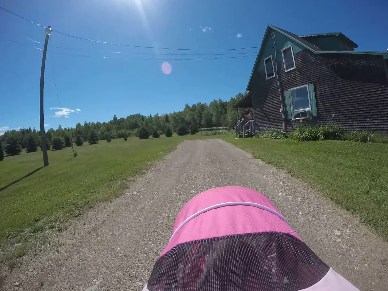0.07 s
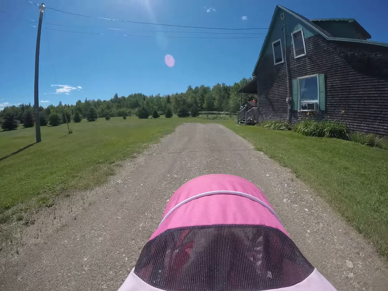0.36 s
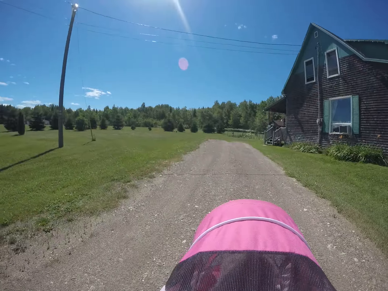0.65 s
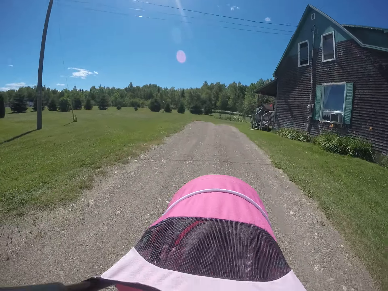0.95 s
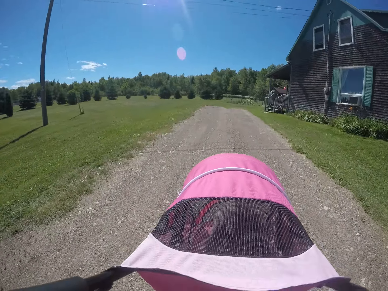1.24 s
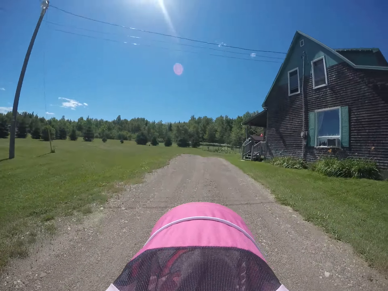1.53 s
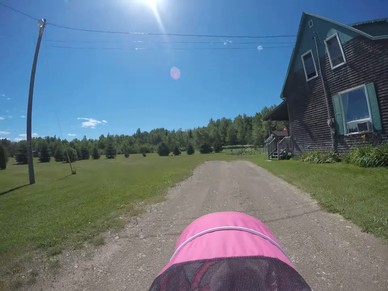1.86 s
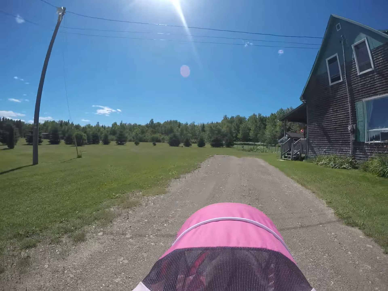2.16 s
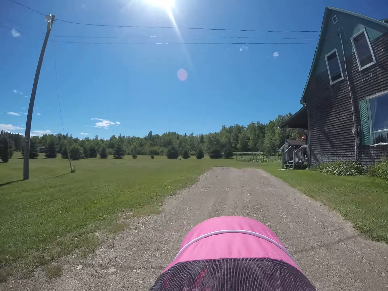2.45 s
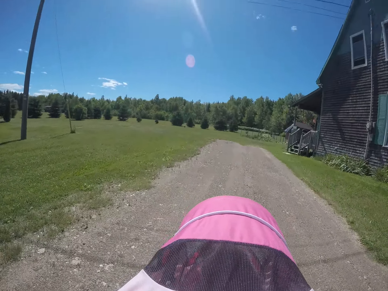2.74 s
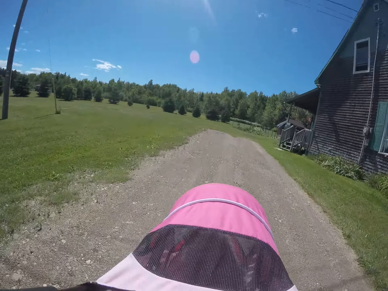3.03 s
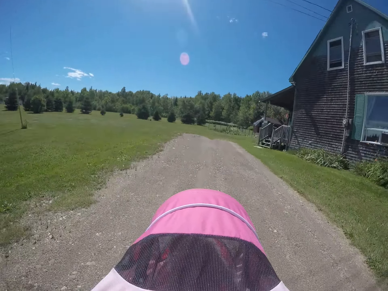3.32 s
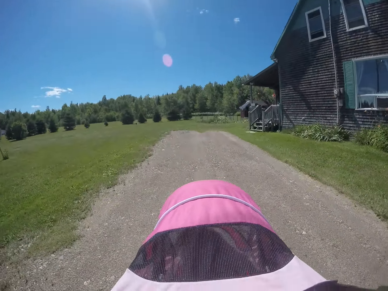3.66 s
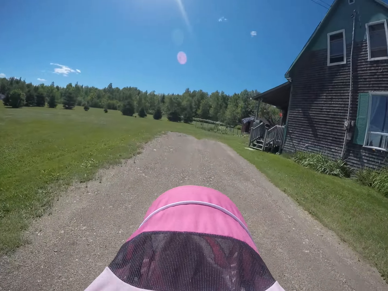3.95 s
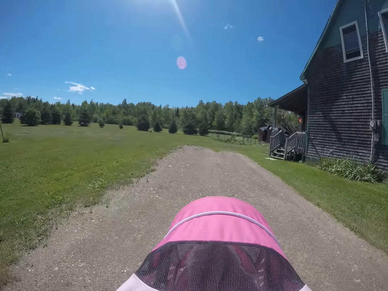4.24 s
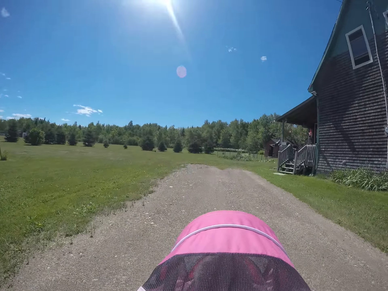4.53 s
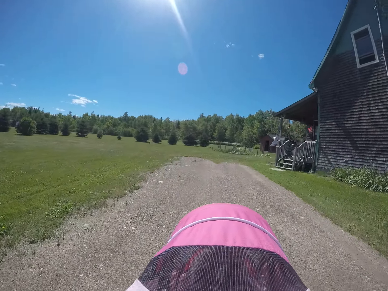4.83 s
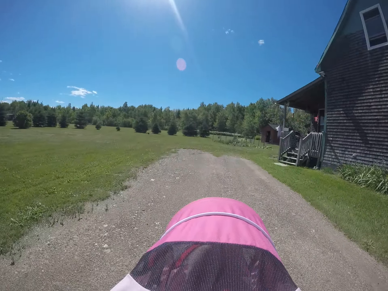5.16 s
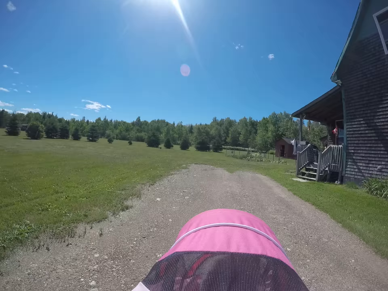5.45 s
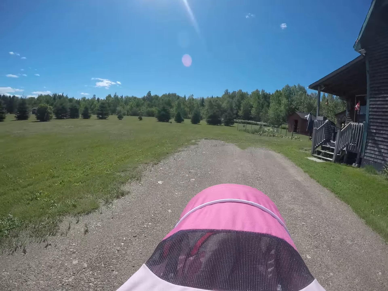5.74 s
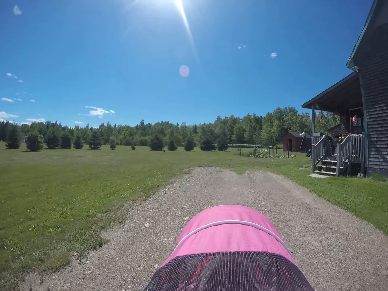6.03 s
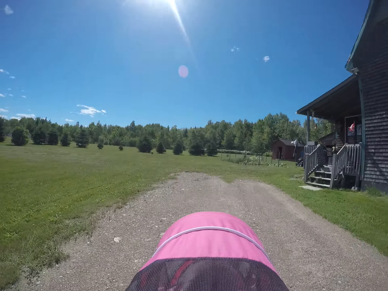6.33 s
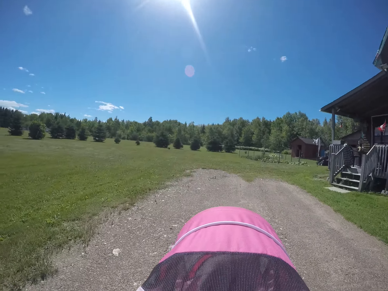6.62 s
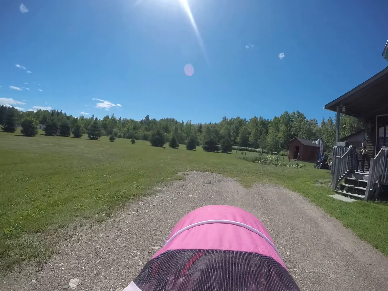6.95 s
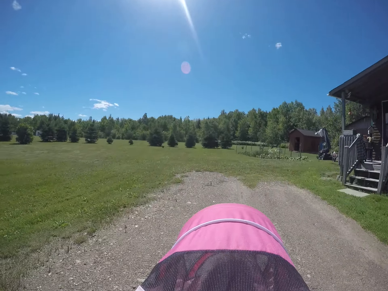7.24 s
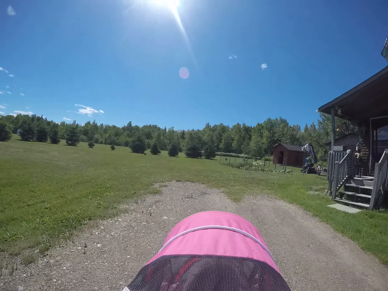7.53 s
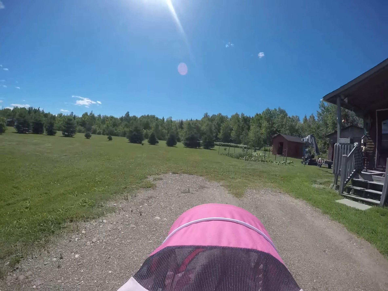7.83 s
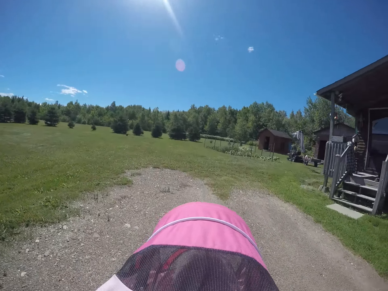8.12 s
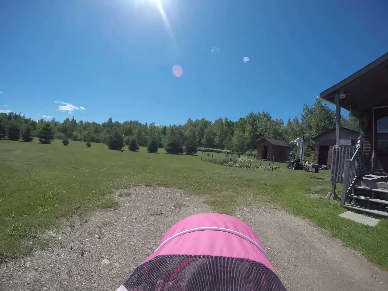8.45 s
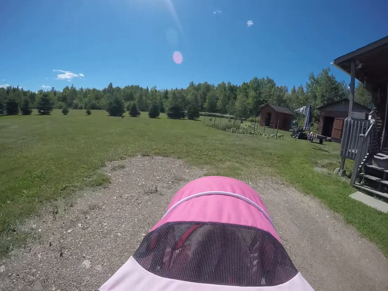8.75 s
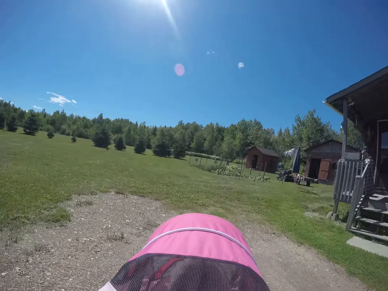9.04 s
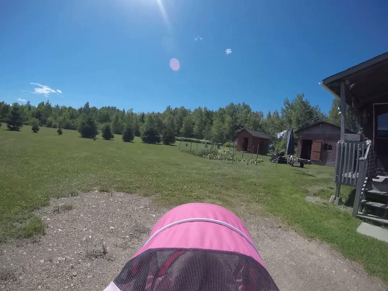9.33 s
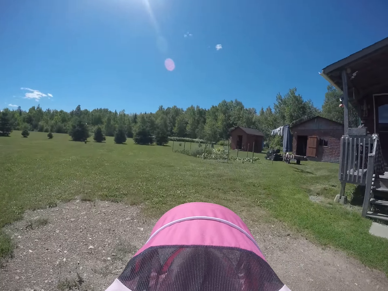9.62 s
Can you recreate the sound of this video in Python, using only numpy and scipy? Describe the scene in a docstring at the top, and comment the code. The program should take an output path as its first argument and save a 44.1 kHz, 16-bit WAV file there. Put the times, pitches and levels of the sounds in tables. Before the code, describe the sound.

A stroller rolls over gravel, its plastic and metal parts knocking and rattling above a low rumble and soft crunch.

```python
"""Stroller on a gravel drive

A stroller is pushed down a gravel drive with a camera fixed to its frame. On the bumps the loose mount
knocks against its stop, and now and then a frame joint clacks; each impact excites damped modes.
Beneath them the uneven ground forces a deep shudder from the frame, the tyres rumble and drum the
hollow body, and many small stone contacts sum to a soft crunch."""
import sys
import numpy as np
from scipy import signal
from scipy.fft import rfft, irfft
from scipy.io import wavfile
from scipy.ndimage import uniform_filter1d, minimum_filter1d

SR = 44100
rng = np.random.default_rng(int(sys.argv[2]) if len(sys.argv) > 2 else 0)


def materialize(psi):
    """Save the field psi as 16-bit PCM at rate SR to the path in sys.argv[1].

    A 1-D psi becomes a single channel; in a 2-D psi each row is a channel.
    """
    bounded = np.clip(np.atleast_2d(psi).T, -1, 1)
    quanta = np.round(bounded * 32767).astype(np.int16)
    wavfile.write(sys.argv[1], SR, quanta)


N = 426888
TIME = np.arange(N) / SR
BLOW_SIZE = 16384  # samples
BLOW_HZ = np.fft.rfftfreq(BLOW_SIZE, 1 / SR)
NOTE_DAMPING = .33  # bandwidth of a clack's or bump's hollow note as a share of its pitch

# strength of the frame's shudder: time_s, level_db
SHUDDER_LEVEL = [(0.0, -18.5), (0.38, -14.5), (0.52, -25.5), (0.76, -20), (0.86, -44), (0.95, -13),
                 (2.9, -17), (3.72, -15), (3.88, -25.5), (4.05, -17), (4.6, -14), (6.4, -17), (6.8, -14.5),
                 (7.7, -14.5), (8.05, -18), (8.7, -15.5), (9.3, -20.5), (9.55, -15)]
# spectrum of the shudder: frequency_hz, level_db
SHUDDER_SPECTRUM = [(5, -28), (11, -8), (17, -4.5), (34, 0), (42, -7), (52, -9.5), (65, -17.5), (80, -26.5),
                    (110, -32.5), (200, -48.5), (500, -89.5), (4000, -120)]
# roughness of the ground, heard as tyre rumble: time_s, level_db
GROUND_ROUGHNESS = [(0.0, -47), (0.38, -49), (0.5, -50), (0.85, -59), (1.1, -47), (1.85, -39), (2.8, -47.5),
                    (3.7, -42.5), (4.1, -53), (4.35, -39.5), (5.1, -51), (5.55, -44), (6.5, -49),
                    (6.85, -43.5), (7.6, -43), (8.0, -53), (8.2, -50), (9.2, -50), (9.68, -52)]
# spectrum of the rumble: frequency_hz, level_db
TYRE_SPECTRUM = [(40, -30.5), (100, 2.5), (150, -7), (230, -6.5), (330, -14.5), (500, -18.5), (720, -25),
                 (1000, -38), (2000, -43.5), (6000, -50), (15000, -79.5)]
# loose gravel under the wheels, heard as crunch: time_s, level_db
LOOSE_GRAVEL = [(0.0, -53), (0.8, -59.5), (1.05, -53), (1.5, -60.5), (2.45, -62), (3.1, -61), (3.75, -56),
                (4.1, -63), (4.38, -52.5), (4.65, -58.5), (5.3, -59), (5.75, -58), (6.35, -63), (6.8, -58),
                (7.7, -55.5), (8.7, -58), (9.3, -62), (9.68, -60.5)]
# spectrum of the crunch: frequency_hz, level_db
CRUNCH_SPECTRUM = [(350, -29.5), (650, -6), (900, -2.5), (1700, -8.5), (2200, -5.5), (2650, -3.5),
                   (3050, -6.5), (3550, -7), (3970, -13), (4550, -11), (6200, -18), (7400, -18.5),
                   (12500, -23), (16000, -31.5)]
# how strongly the wheels drum the hollow body: time_s, level_db
DRUMMING_LEVEL = [(0.9, -56), (1.0, -45), (1.95, -50), (2.4, -59), (3.2, -67), (3.7, -58), (4.5, -55.5),
                  (4.9, -66.5), (9.68, -68)]
# damped modes of the joints: pitch_hz, bandwidth_hz, level_db
JOINT_MODES = [(200, 110, -12), (900, 500, -9), (1300, 400, -12), (2280, 240, -3), (2950, 170, -1),
               (3150, 150, 1), (4300, 900, -19), (7000, 1500, -26), (11000, 4000, -30)]
# damped modes of the plastic mount: pitch_hz, bandwidth_hz, level_db
MOUNT_MODES = [(236, 170, -15.5), (718.6, 149, 1.5), (894, 110, -10.5), (1230, 124, -9), (1483, 194, -6),
               (1983, 96, 0), (2220, 110, -1.5), (2316, 140, -2), (2488, 264, -4.5), (3086, 81, -7.5),
               (3280, 200, -5), (3930, 220, -3), (4240, 72, -6), (5040, 83, -15), (5445, 170, -3),
               (5800, 170, -14.5), (6940, 230, -18.5), (8220, 400, -11.5), (9800, 450, -13.5),
               (11820, 1400, -14.5)]
# modes of the metal frame tube: pitch_hz, level_db, t60_s
TUBE_MODES = [(1330, -5, .05), (1846, -12, .28), (2207, -1, .125), (2765, -9, .07), (3232, -8, .1),
              (5340, -11, .05)]
# joint clacks, and a few faint, dull bumps of stones under the wheels:
# start_s, level_db, corner_hz, pitch_hz
CLACKS_AND_BUMPS = [(0.0366, -14.5, 3000, 790), (0.0663, -12, 4770, 1100), (0.1736, -32.5, 2380, 910),
                    (0.3485, -20.5, 2730, 970), (0.3654, -13.5, 16000, 955), (0.477, -34, 2200, 1260),
                    (0.66, -41, 2000, 700), (0.713, -29.5, 1700, 470), (0.7457, -28.5, 1800, 496),
                    (0.84, -36, 1400, 500), (1.3817, -29.5, 3500, 520), (2.008, -16.5, 4320, 487),
                    (2.231, -39, 1800, 905), (2.5075, -17, 15400, 1240), (3.0492, -16.5, 4170, 500),
                    (3.2848, -18, 6400, 507), (3.429, -33, 3600, 690), (3.648, -28, 12300, 442),
                    (3.7518, -25.5, 5350, 980), (3.8073, -21.5, 5400, 450), (6.549, -45.5, 1400, 650),
                    (6.851, -36, 1400, 600), (7.438, -37.5, 1800, 900), (8.1829, -10, 5760, 475),
                    (8.2036, -28, 3300, 467), (8.5501, -22.5, 5600, 1200), (8.566, -24.5, 3000, 470),
                    (8.714, -35, 1800, 900)]
# the mount hits its stop on a bump: start_s, level_db
MOUNT_KNOCKS = [(0.0379, -14.5), (0.0494, -11), (0.3658, -5.5), (0.4, -17), (0.5411, -11), (0.9591, -1.5),
                (1.0126, -21), (1.0628, -15.5), (1.1356, -15.5), (1.2801, -10.5), (1.3179, -21.5),
                (1.3647, -24), (1.4523, -21), (1.5293, -20.5), (1.5706, -21), (1.8012, -8), (1.9626, -15.5),
                (2.0176, -16.5), (2.1107, -15), (2.4939, -9.5), (2.5485, -20), (2.677, -15), (2.7048, -22),
                (2.7535, -20.5), (2.7855, -18.5), (2.824, -23), (2.8523, -17), (2.9625, -15), (3.2557, -6),
                (3.3531, -22.5), (3.402, -20.5), (3.4797, -22.5), (3.54, -22), (3.6217, -15),
                (3.6631, -15.5), (3.7215, -23), (3.7837, -14), (3.8396, -23.5), (3.9041, -13), (3.934, -25),
                (4.0686, -10), (4.0845, -25), (4.1187, -20), (4.2308, -20.5), (4.2824, -24),
                (4.3213, -24.5), (4.3568, -20.5), (4.4348, -21), (4.5403, -20.5), (4.6026, -21.5),
                (4.6539, -30), (5.749, -3), (5.9027, -9.5), (6.0643, -15.5), (6.1357, -9), (6.154, -24),
                (6.7863, -13), (6.8163, -12.5), (8.1153, -5), (8.1338, -25.5), (8.2213, -16), (8.2364, -24),
                (8.3035, -14), (8.364, -17.5), (8.7568, -7.5), (8.9623, -7), (9.092, -7.5), (9.1198, -28),
                (9.4877, -11), (9.512, -19), (9.5527, -14), (9.5811, -24.5), (9.6256, -22), (9.6749, -18.5)]
# contact hardness for a knock listed at 0 dB: time_s, corner_hz
KNOCK_HARDNESS = [(0.4, 19502.5), (1.1, 11998), (2.0, 19497), (3.7, 22503), (4.3, 14496), (6.1, 15493),
                  (6.8, 9998.5), (9.0, 17501.5), (9.6, 14000.5)]
# a stone snaps out from under a tyre: start_s, level_db
STONE_SNAPS = [(1.2434, -33), (2.7184, -26), (2.8404, -31), (3.173, -37.5), (3.4053, -24), (3.6466, -21),
               (4.342, -28), (4.363, -23), (4.4044, -31), (4.48, -30), (4.4888, -22.5), (4.5205, -24),
               (4.782, -29.5), (4.857, -26), (4.9006, -26), (4.9075, -26.5), (5.722, -34.5), (6.0327, -25),
               (7.3203, -40), (7.5375, -30)]
# spectrum of a snap: frequency_hz, level_db
SNAP_SPECTRUM = [(500, -30.5), (1500, 6), (3000, 14.5), (5000, 1.5), (8000, 4.5), (11000, -10.5),
                 (15000, -4), (17000, -15)]


def from_db(db):
    """Amplitude ratio of a level in decibels."""
    return 10 ** (np.asarray(db) / 20)


def unit(x):
    """Normalisation to rms 1."""
    return x / np.sqrt(np.mean(x ** 2) + 1e-20)


def follow(curve):
    """Amplitude envelope through (time_s, level_db) points."""
    return from_db(np.interp(TIME, *np.transpose(curve)))


def coloured(x, spectrum):
    """Spectral shaping by (frequency_hz, level_db) points, to rms 1."""
    hz, db = np.transpose(spectrum)
    shape_db = np.interp(np.log(np.fft.rfftfreq(len(x), 1 / SR) + 1), np.log(hz), db)
    return unit(irfft(rfft(x) * from_db(shape_db), len(x)))


def add(mix, start_s, sound):
    """Superposition: a sound joins the mix at start_s."""
    part = mix[max(round(start_s * SR), 0):][:len(sound)]
    part += sound[:len(part)]


def swell(depth_db, size):
    """Random amplitude modulation: a gain that wanders over about size samples."""
    drift = uniform_filter1d(rng.standard_normal(N), size, mode="wrap")
    return from_db(depth_db * unit(uniform_filter1d(drift, size // 2, mode="wrap")))


def stones(per_s, spread_db):
    """A Poisson process of stone contacts, mostly small and a few large."""
    out, at = np.zeros(N), np.flatnonzero(rng.random(N) < per_s / SR)
    draw = rng.uniform(-1, 1, N)[at]
    size = np.minimum(-np.log(abs(draw) + 1e-9), 4)
    out[at] = np.sign(draw) * from_db(spread_db * size)
    return out


def modal_response(modes, scatter_db):
    """Damped modes superpose; the point of contact changes their shares from blow to blow."""
    hz, width_hz, db = np.transpose(modes)[:, :, None]
    share = from_db(db + scatter_db * rng.standard_normal(db.shape))
    loss = 1j * BLOW_HZ * np.maximum(width_hz, 105)  # no mode is narrower than 105 Hz, so none rings for long
    return (share * loss / (hz ** 2 - BLOW_HZ ** 2 + loss)).sum(0)


def contact(corner_hz):
    """Spectrum of a force pulse: the shorter the contact, the higher the corner."""
    rounded = np.exp(-(BLOW_HZ / (2.8 * corner_hz)) ** 2)  # the pulse starts and ends gently
    return rounded * (1 + 1j * BLOW_HZ / corner_hz) ** -4


def rebounding(share, gap_s):
    """Comb filtering: a weaker second contact follows the first after an uneven gap."""
    return 1 + share * np.exp(-2j * np.pi * BLOW_HZ * gap_s * rng.uniform(.65, 1.35))


def bending(spread_s, knee_hz=2500):
    """Dispersion of bending waves: the treble arrives first, the bass later."""
    return np.exp(-2j * np.pi * spread_s * knee_hz * np.arctan(BLOW_HZ / knee_hz))


def blow(spectrum, db):
    """Energy normalisation: a blow that, packed into two milliseconds, has the given level."""
    wave = irfft(spectrum)
    return from_db(db) * wave / np.sqrt(np.sum(wave ** 2) / (.002 * SR))


def frame_shudder(level_db=1.78, lurch_db=2.0, steadiness=0.87):
    """Forced vibration: uneven ground shakes the sprung frame in lurches of nearly even strength."""
    shake = coloured(rng.standard_normal(N), SHUDDER_SPECTRUM) * swell(lurch_db, size=2000)
    power = uniform_filter1d(shake ** 2, size=5500)
    strength = np.sqrt(uniform_filter1d(power, size=3500) + 1e-6)
    return from_db(level_db) * follow(SHUDDER_LEVEL) * shake / strength ** steadiness


def tyre_rumble(level_db=4.0, lumps_db=3.0):
    """Shot noise: pebbles press into the tyres as dull, overlapping thumps."""
    thumps = stones(per_s=400, spread_db=3.64) * swell(lumps_db, size=1400)
    return from_db(level_db) * follow(GROUND_ROUGHNESS) * coloured(thumps, TYRE_SPECTRUM)


def grinding(bump_db=2.5, decay_s=0.023):
    """Envelope of the crunch: it follows the loose gravel and rises briefly as the mount knocks."""
    bumps = np.zeros(N)
    for start_s, _ in MOUNT_KNOCKS:  # these bumps grind the stones harder
        add(bumps, start_s, np.exp(-TIME[:BLOW_SIZE] / decay_s))
    return follow(LOOSE_GRAVEL) * from_db(bump_db * np.minimum(bumps, 1))


def gravel_crunch(clump_db=4.0, wash=0.8, surge_db=1.9):
    """Granular friction: grit grinds under the wheels in clumps and slower surges, over a sandy wash."""
    grit = unit(stones(per_s=1900, spread_db=4.5) * swell(clump_db, size=900))
    crunch = coloured(grit + wash * rng.standard_normal(N), CRUNCH_SPECTRUM)
    return grinding() * swell(surge_db, size=3000) * crunch


def pebble_scrapes(level_db=-4, decay_s=0.0079, width=0.24, db_per_octave=-5.5, middle_hz=2800):
    """Sliding friction: each size of pebble scrapes in its own band, the middle sizes loudest."""
    out, t = np.zeros(N), TIME[:2048]
    hz = np.fft.rfftfreq(len(t), 1 / SR)
    for pitch_hz in np.geomspace(1100, 8500, 16):
        band = np.exp(-.5 * ((hz / pitch_hz - 1) / width) ** 2)
        scrape = unit(irfft(rfft(rng.standard_normal(len(t))) * band)) * np.exp(-t / decay_s)
        gain = from_db(db_per_octave * abs(np.log2(pitch_hz / middle_hz)))
        out += gain * signal.oaconvolve(stones(per_s=6, spread_db=4.5), scrape)[:N]
    return from_db(level_db) * grinding() * unit(out)


def frame_ticks(level_db=-1, corner_hz=9000, decay_s=0.0074):
    """Structure-borne sound: stones slipping under the rims excite the upper modes of the joints."""
    out, t = np.zeros(N), TIME[:BLOW_SIZE]
    for wheel in range(4):
        chatter = rfft(rng.standard_normal(BLOW_SIZE) * np.exp(-t / decay_s))
        tick = irfft(modal_response(JOINT_MODES[3:], scatter_db=6.5) * contact(corner_hz) * chatter)
        out += signal.oaconvolve(stones(per_s=12, spread_db=2.0), unit(tick[:2048]))[:N]
    return from_db(level_db) * grinding() * unit(out)


def body_drumming(corner_hz=1100):
    """Resonance: on coarse gravel, soft blows from the tyres sustain the low modes of the plastic."""
    thud = irfft(modal_response(MOUNT_MODES, scatter_db=0.5) * contact(corner_hz))
    thuds = signal.oaconvolve(stones(per_s=350, spread_db=3.5), thud)[:N]
    return follow(DRUMMING_LEVEL) * unit(thuds)


def tube_ring(buzz_db=-15, buzz_s=0.028):
    """Free vibration: spectrum of the struck frame tube, with a brief buzz of its loose fittings."""
    t = TIME[:BLOW_SIZE]
    ring = sum(from_db(db - 60 * t / t60) * np.sin(2 * np.pi * hz * t) for hz, db, t60 in TUBE_MODES)
    buzz = from_db(buzz_db) * np.exp(-t / buzz_s) * rng.standard_normal(BLOW_SIZE)
    return rfft(ring + buzz)


def clacks_and_bumps(level_db=3.1, ring_db=-69, spread_s=0.0014):
    """Impact and rebound: a joint clacks, or a stone bumps dully under a wheel, in two quick contacts."""
    out, ring, travel = np.zeros(N), from_db(ring_db) * tube_ring(), bending(spread_s)
    for start_s, db, corner_hz, pitch_hz in CLACKS_AND_BUMPS:
        modes = [(pitch_hz, NOTE_DAMPING * pitch_hz, 0), *JOINT_MODES]
        force = contact(corner_hz) * rebounding(share=.65, gap_s=.0026)
        response = modal_response(modes, scatter_db=2) + ring
        add(out, start_s - spread_s / 2, blow(response * force * travel, db + level_db))
    return out


def settling_chatter(level_db=-23, level_slope=0.67, decay_s=0.02, corner_hz=4800):
    """Frictional excitation: a brief scuff follows each clack or bump, relatively more if it is light."""
    out, settling = np.zeros(N), np.exp(-TIME[:BLOW_SIZE] / decay_s)
    for start_s, db, _, pitch_hz in CLACKS_AND_BUMPS:
        modes = [(pitch_hz, NOTE_DAMPING * pitch_hz, -3), *JOINT_MODES]
        friction = rfft(rng.standard_normal(BLOW_SIZE))
        rubbing = irfft(friction * modal_response(modes, scatter_db=-1) * contact(corner_hz))
        add(out, start_s, from_db(level_db + level_slope * db) * settling * unit(rubbing))
    return out


def mount_knocks(level_db=5.0, ring_db=-57.0, spread_s=.0008, db_per_octave=8.5):
    """Elastic impact: the harder the plastic mount hits its stop, the shorter and brighter the blow."""
    out, ring, travel = np.zeros(N), from_db(ring_db) * tube_ring(), bending(spread_s)
    for start_s, db in MOUNT_KNOCKS:
        corner_hz = np.interp(start_s, *np.transpose(KNOCK_HARDNESS)) * 2 ** (db / db_per_octave)
        force = contact(corner_hz) * rebounding(share=0.16, gap_s=0.000926)
        response = modal_response(MOUNT_MODES, scatter_db=2.7) + ring
        add(out, start_s - spread_s / 2, blow(response * force * travel, db + level_db))
    return out


def stone_snaps(decay_s=0.00055, skitter_db=-20, skitter_s=0.023):
    """Hard impact: stone on stone gives a broadband tick, and a few grains skitter after it."""
    out, t = np.zeros(N), TIME[:2048]
    for start_s, db in STONE_SNAPS:
        burst, noise = rng.standard_normal((2, len(t)))
        tick = coloured(burst, SNAP_SPECTRUM) * np.exp(-t / decay_s)
        grains = coloured(noise ** 7, SNAP_SPECTRUM)  # the high power leaves sparse spikes
        skitter = from_db(skitter_db) * grains * np.exp(-t / skitter_s)
        add(out, start_s, from_db(db) * (tick + skitter))
    return out


def scene():
    """Free field: in the open air every source reaches the one microphone directly."""
    impacts = mount_knocks() + clacks_and_bumps() + settling_chatter()
    vibration = frame_ticks() + body_drumming() + frame_shudder()
    ground = tyre_rumble() + gravel_crunch() + pebble_scrapes() + stone_snaps()
    return (impacts + vibration + ground)[None]


def record(dry):
    """Peak limiting holds the hardest knocks at full scale; a low-pass filter then limits the band."""
    allowed_gain = 1 / np.maximum(abs(dry), 1)
    smooth_gain = uniform_filter1d(minimum_filter1d(allowed_gain, size=15), size=15)
    low_pass = signal.firwin(201, cutoff=15450, window=("kaiser", 9), fs=SR)
    return signal.oaconvolve(dry * smooth_gain, low_pass[None], "same")


dry = scene()
out = record(dry)
materialize(out)
```